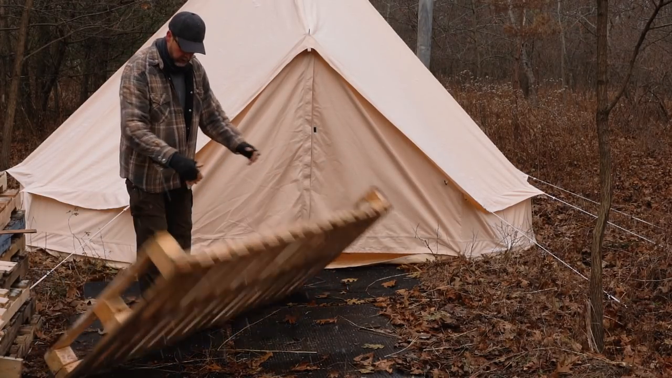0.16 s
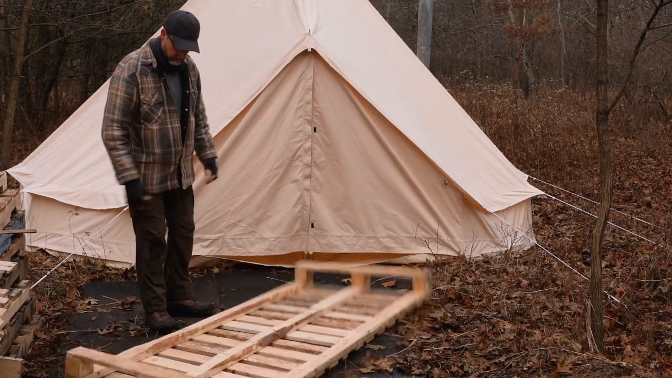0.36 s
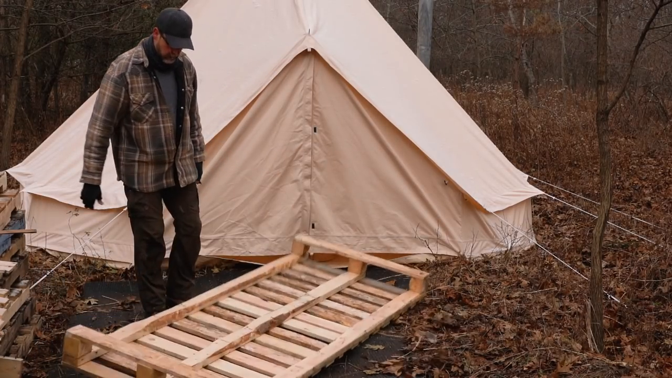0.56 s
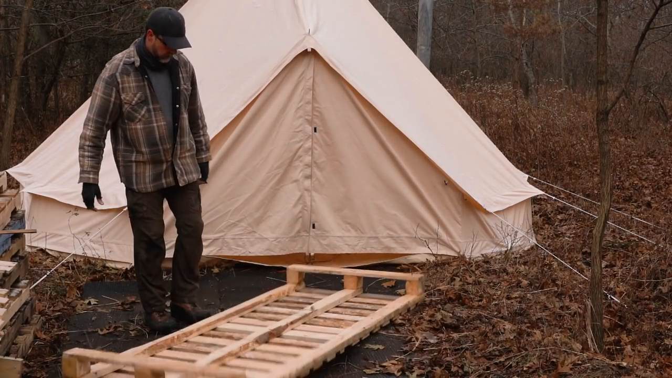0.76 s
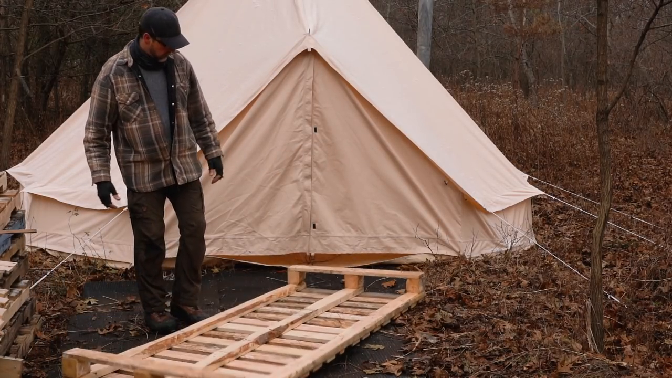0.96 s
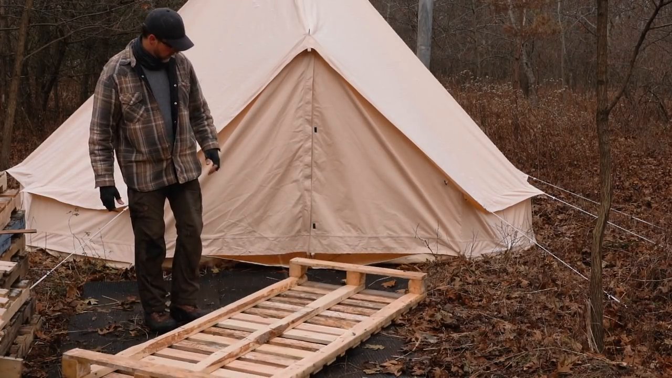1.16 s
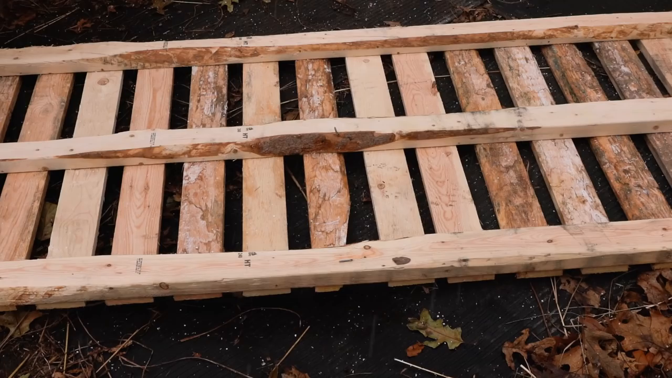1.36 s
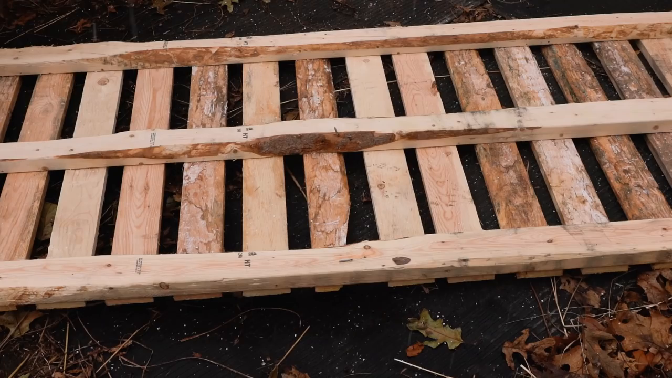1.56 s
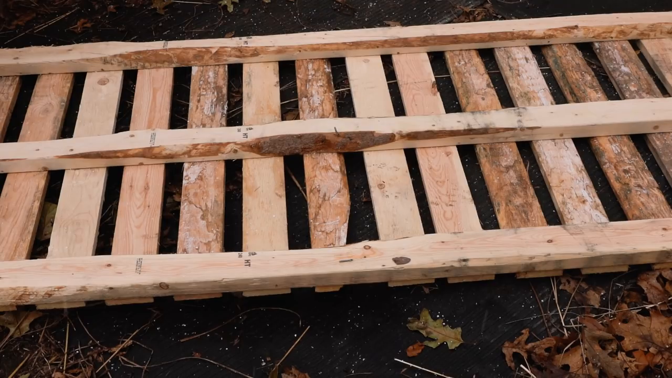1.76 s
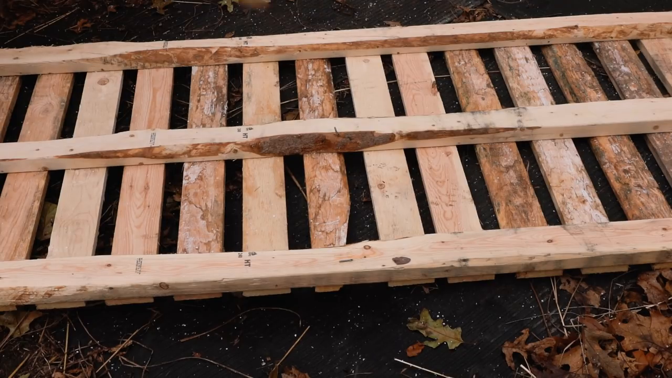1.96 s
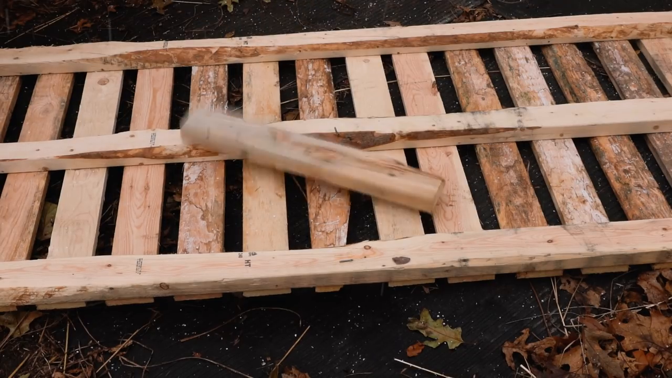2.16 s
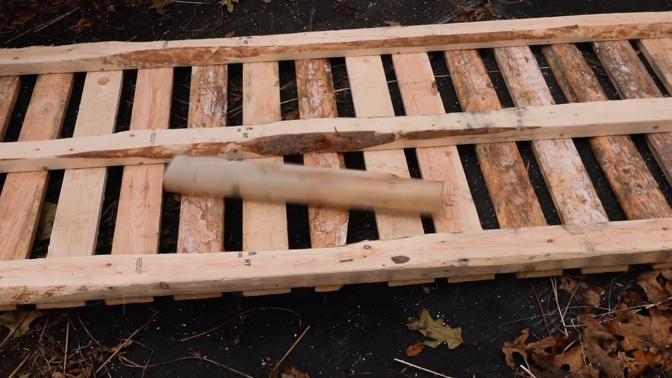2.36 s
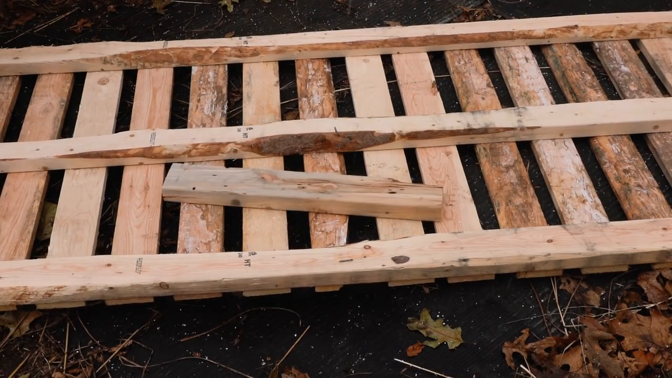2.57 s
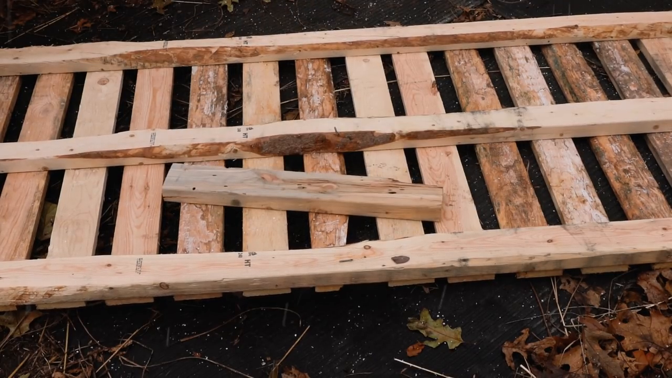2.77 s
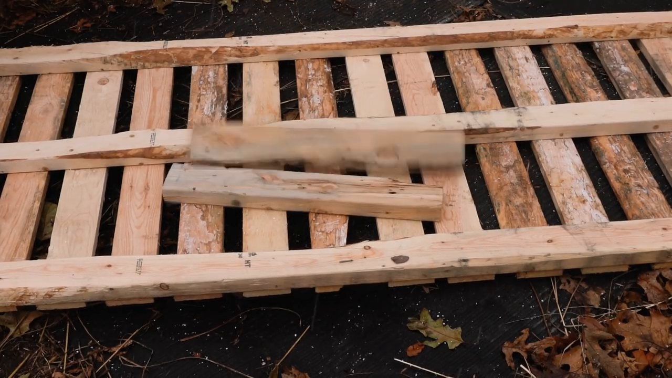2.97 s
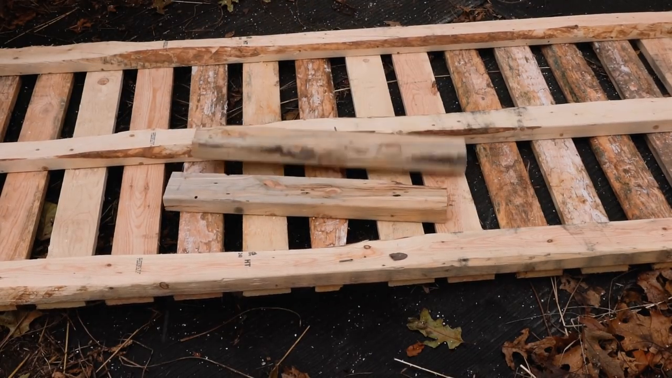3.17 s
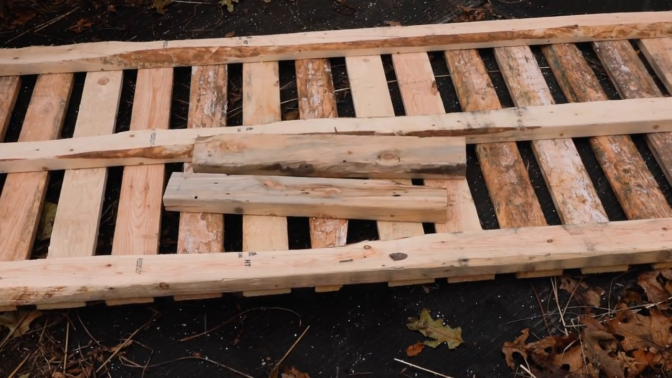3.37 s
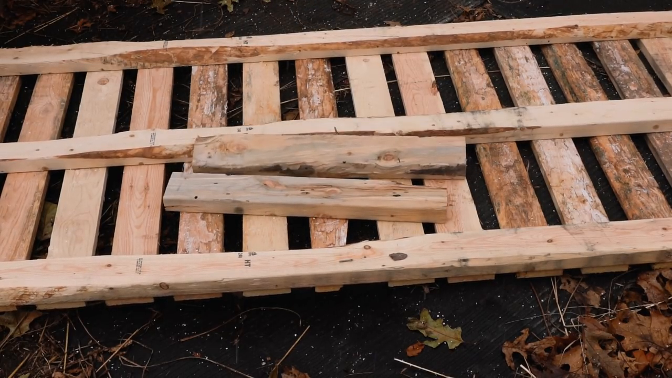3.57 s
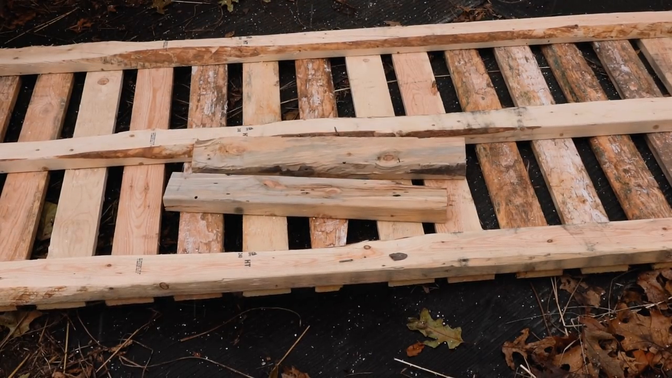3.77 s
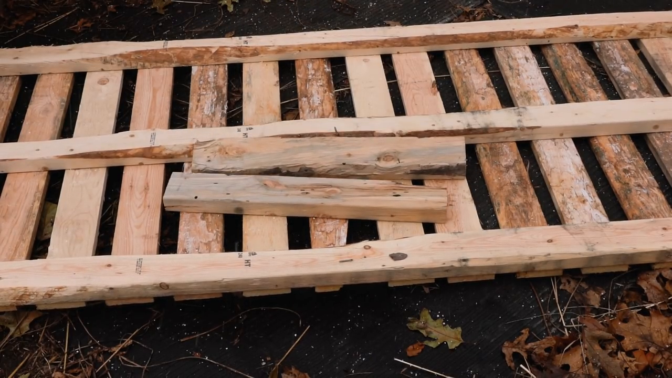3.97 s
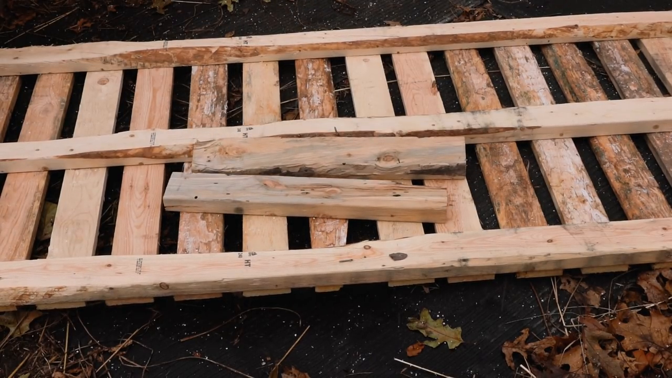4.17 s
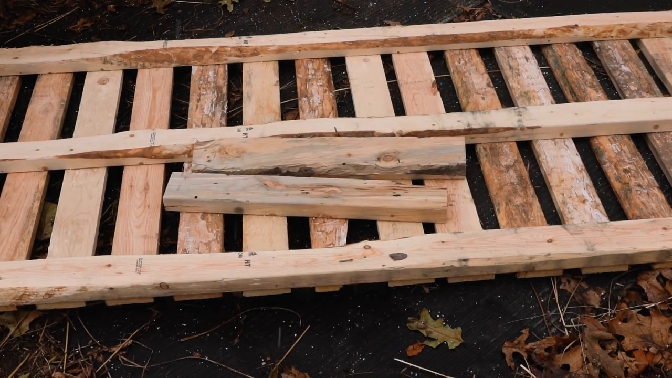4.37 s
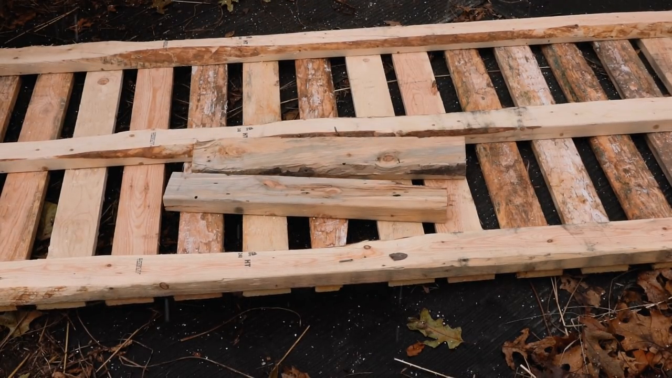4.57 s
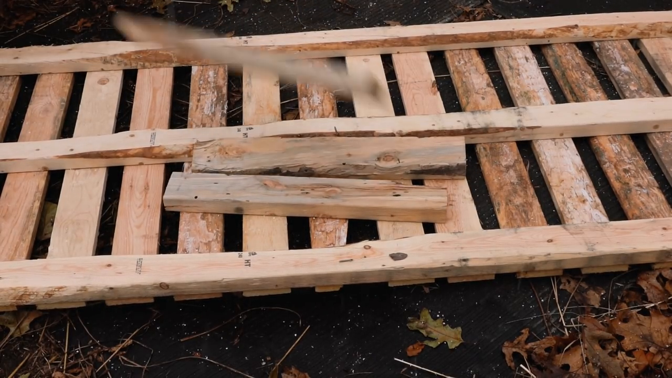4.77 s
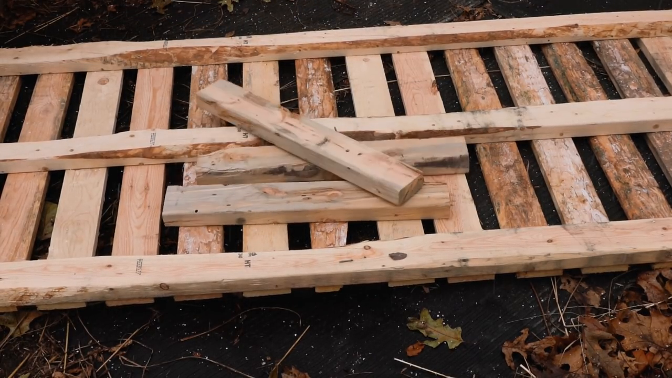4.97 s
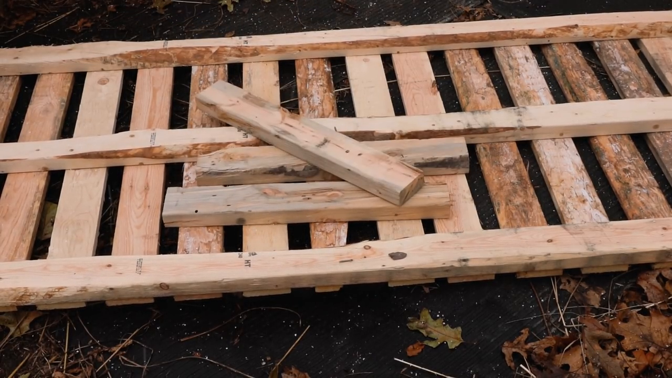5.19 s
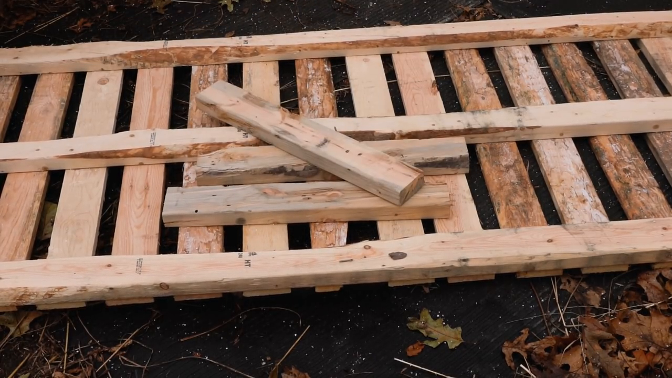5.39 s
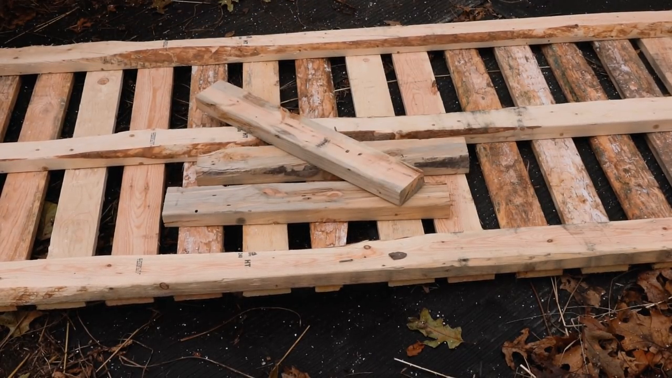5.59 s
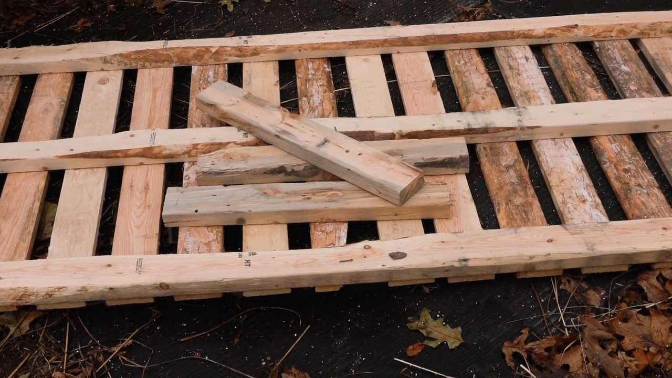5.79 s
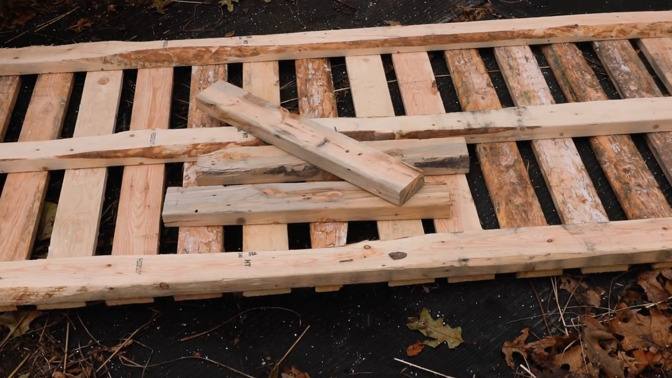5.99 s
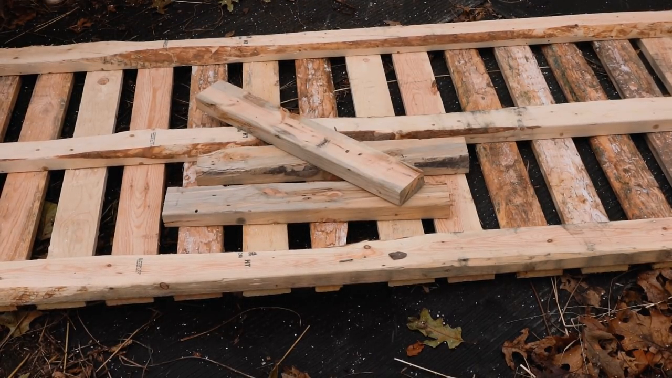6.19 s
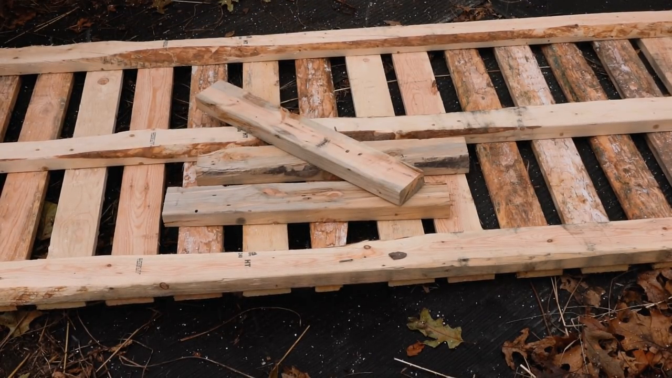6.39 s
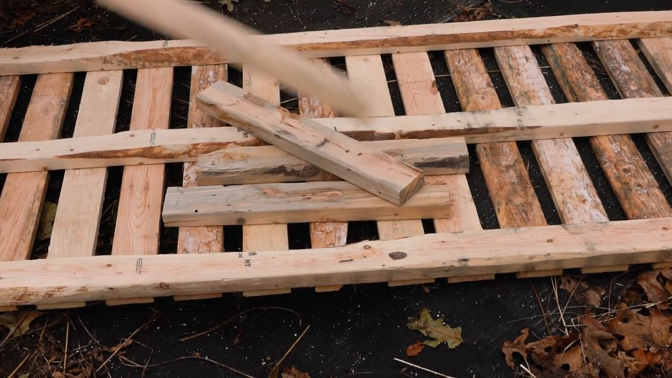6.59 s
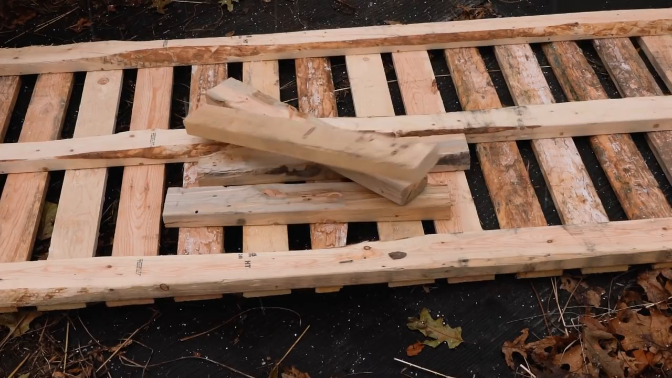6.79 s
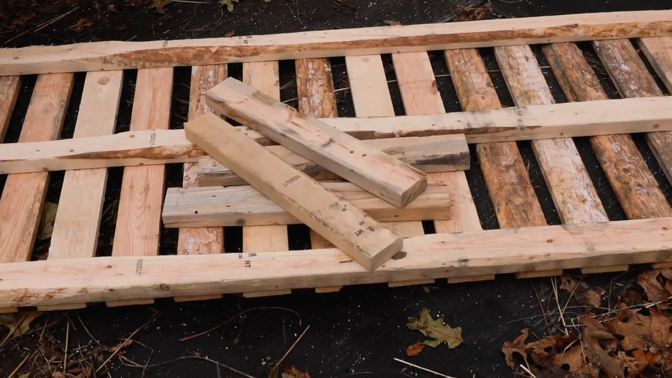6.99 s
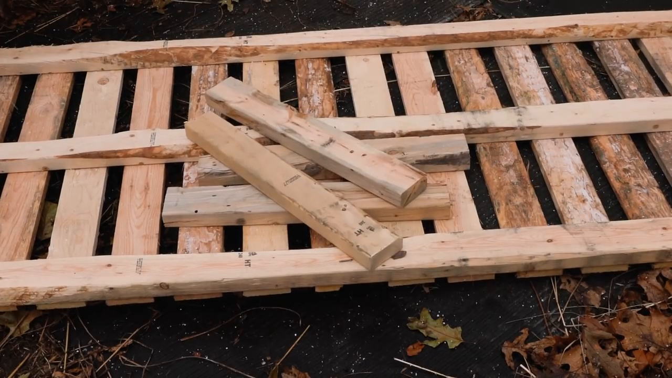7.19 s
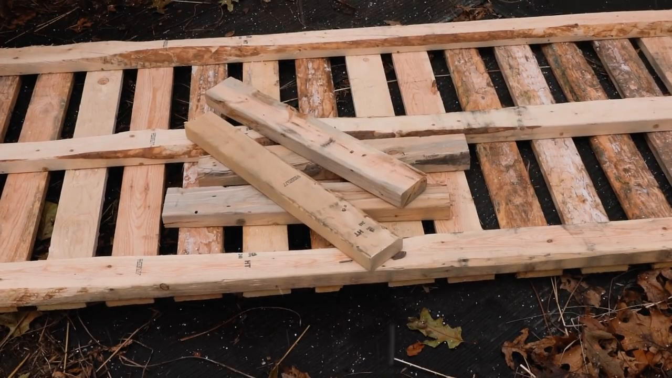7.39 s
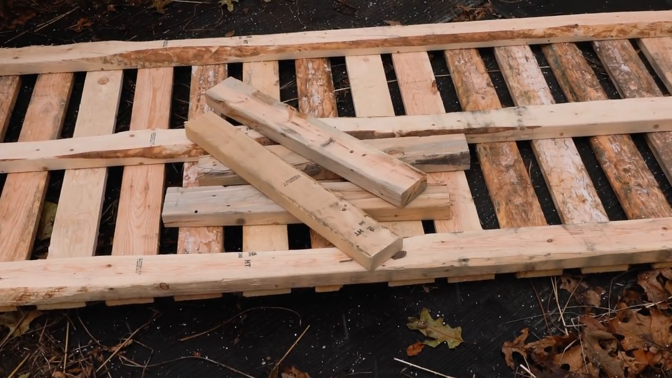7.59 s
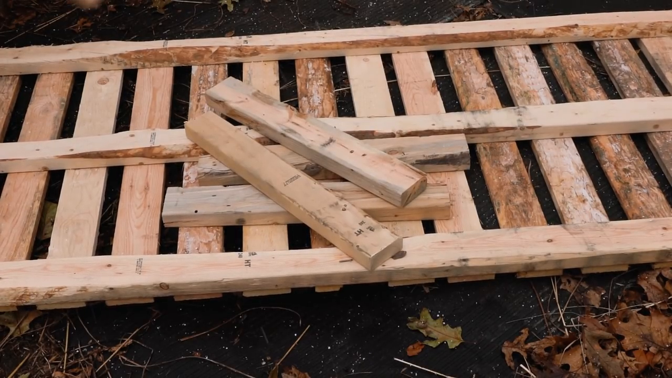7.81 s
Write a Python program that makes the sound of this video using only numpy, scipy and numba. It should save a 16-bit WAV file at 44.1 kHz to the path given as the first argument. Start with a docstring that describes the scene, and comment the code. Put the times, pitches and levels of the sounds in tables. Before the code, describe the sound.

Close outdoor wood sounds in mono: a pallet falls with a double slam, dry leaves crunching beneath, and knocks unevenly to rest. After a pause, boards are dropped on it one at a time, each giving a sharp knock, a few bounces and a short woody ring. Scraping, a shifted board and a tiny tap fill the gaps. Faint leaf ticks and low woodland hush lie underneath; the hardest blows sound squashed.

```python
"""Outdoors on leafy ground, one channel, the wood close and dry: a pallet topples and rocks to rest.
After a faint rustle, two short boards drop on the pallet, chattering as they ring. Wood is scraped as
a third is lifted off the stack, jolting a spare one, and dropped; after more handling, a fourth falls.
Knocks are filtered noise, ringing is decaying sines; trees return a dull echo over a quiet hush.
The recorder's compressor and clipping flatten the hardest blows."""
import sys
import numpy as np
from scipy import signal
from scipy.fft import rfft, irfft
from scipy.io import wavfile
from scipy.ndimage import uniform_filter1d
from numba import njit

SR = 44100
rng = np.random.default_rng(int(sys.argv[2]) if len(sys.argv) > 2 else 0)


def unload_audio(sound):
    """Save the sound as a 16-bit wav file, at the path given as the first command line argument."""
    columns = np.transpose(np.atleast_2d(sound))
    # keep every value between -1 and 1, then stretch to whole-number steps
    steps = np.round(np.clip(columns, -1, 1) * 32767)
    wavfile.write(sys.argv[1], SR, steps.astype(np.int16))


N = 346185
TIME = np.arange(N) / SR  # s
RING_TIME = TIME[:SR // 2]  # s, the half second given to each blow

# Pallet hitting the ground, corner to corner:
# (time [s], force [dB], brightness [dB per octave], thud before trim [dB re force])
PALLET_BLOWS = [(.421, 2.5, 1, 3.5), (.440, 1, 0, 0.5), (.484, -11.5, 0.5, -7), (0.585, -13.5, -4.5, 5),
                (.605, -1, -1, -5), (0.7715, -2.5, 1.5, -15), (.794, -8, 0.5, 9), (.804, 2.5, -1, -2),
                (.890, -4, 1, 1), (1.011, -9.5, 0, 0.5), (1.1452, -9.5, -6, -1.5), (1.3411, -14.5, -3.5, 2)]
# Clear knocks of board on wood: (time [s], force [dB], brightness [dB per octave])
BOARD_BLOWS = [ (2.2126, 0, 1), (2.236, 16.5, 2), (2.402, -5.5, -0.5), (2.444, -1.5, 2), (2.462, 1.5, -0.5),
               (2.499, -5.5, -1.5), (2.554, -4.5, 2.5), (2.601, -7.5, -2), (3.033, 4.5, 5),
               (3.0702, 14.5, 1.5), (3.116, 0, -0.5), (3.136, -1.5, 0.5), (3.165, -10, -1.5),
               (3.2325, 0.5, -2.5), (3.304, -1.5, -4.5), (3.347, -11.5, -5.5), (3.406, -13, -4.5),
               (3.934, -7.5, -3.5), (4.103, -1, -3), (4.915, 5.5, -.5), (4.937, 0, .5), (4.979, 1.5, 0),
               (4.993, 0.5, 1.2), (5.033, -6, -1), (5.052, 1, -3), (5.066, -2, -3.5), (6.717, 1.5, 1.5),
               (6.744, 15, 2.5), (6.762, 11, -2), (6.826, 3, -5), (6.923, 1.5, -4.5), (6.987, 0.5, -6),
               (7.015, 12.5, 1), (7.068, 5, -4)]
# When each board after the first takes its turn: (time [s])
NEXT_BOARD_TIMES = [2.9, 3.6, 4.05, 4.8, 6.5]
# Chatter of each turn, until the board lies flat: (start [s], flat [s], chatter level [dB],
# chatter brightness [dB per octave], ring level [dB])
CLATTERS = [(2.46, 2.615, -15.5, -3.5, -1.5), (3.242, 3.311, -5.5, -4, -2.5),
            (3.94, 3.983, -16.5, -6.5, -8), (4.115, 4.146, -9, -3, -1.5), (4.921, 5.08, -4.5, -2.5, -2),
            (6.78, 7.088, -6.5, -9, -3)]
# Low bumps of the pallet swaying under a landed board: (time [s], level [dB])
SWAYS = [(2.295, -15.5), (3.155, -15.5), (6.92, -17)]
# Leaves crushed by the pallet, loudest as it first lands: (time [s], level [dB])
LEAF_CRUSHES = [(0.432, -18.5), (.8, -27.5), (1.29, -40.5)]
# Rubs and scrapes: a faint rustle first, then wood sliding over wood or glove as it is picked up:
# (time [s], length [s], level [dB], brightness [dB per octave])
SCRAPES = [(1.854, 0.047, -47.5, 8.5), (3.606, 0.31, -32.5, -3.5), (4.284, 0.028, -30.5, 3.5),
           (4.55, 0.042, -52, 8.5), (5.881, 0.019, -38, 2), (6.236, 0.19, -49, 6.5)]

# Bending and twisting modes of the pallet, before detuning: (frequency [Hz], level [dB], t60 [s])
PALLET_MODES = [(220, -27, 0.089), (430, -17.5, 0.05), (1271, -7, 0.036), (1570, -25.5, 0.19),
                (2580, -16, 0.038), (3340, -17, 0.045)]
# Modes of each board, in the same columns: (frequency [Hz], level [dB], t60 [s])
FIRST_BOARD = [(254.5, -18, 0.22), (360.5, -22, 0.31), (932, -11, 0.14), (1190, -27, 0.2),
               (1423, -8, 0.044), (1657, -6.5, 0.022), (1876, -6.5, 0.024), (2874, -26, 0.11)]
SECOND_BOARD = [(225, -20.5, 0.2), (377, -9, 0.12), (631, -15.5, 0.22), (749, -16.5, 0.19), (903, -9, 0.14),
                (982, -9.5, 0.2), (1320, -5, 0.048), (1780, -38, .07), (3070, -8, 0.021),
                (3840, -8.5, 0.014)]
THIRD_BOARD = [(208, -23, 0.25), (402.6, -8.5, 0.12), (618, -14, 0.1), (910, -13, 0.16), (1005, -8.5, 0.14),
               (1256, -11, 0.068), (1459, -8, 0.033), (1878, -11, 0.053), (2600, -39, .04),
               (3390, -28, 0.13)]
SPARE_BOARD = [(387, -13.5, 0.076), (515, -6.5, 0.28), (904, -26, 0.16), (998, -5, 0.074),
               (1108, -10, 0.12), (1820, -17, 0.1), (3360, -25, 0.17)]
FOURTH_BOARD = [(509, -12.5, 0.54), (772, -14.5, 0.12), (952, -5.5, 0.081), (1284, -8.5, 0.13),
                (1565, -10, 0.065), (2284, -5, 0.024), (2820, -5, 0.021), (3240, -20, 0.041)]
# A pallet slat, nailed down and quickly damped: (frequency [Hz], level [dB], t60 [s])
SLAT_MODES = [(688, -12, 0.055), (1209, -16, 0.059), (1693, -10, 0.04), (3023, -13.5, 0.031)]
# A light tap of wood on wood as a board is lifted: (frequency [Hz], level [dB], t60 [s])
TAP_MODES = [(1300, -36.5, 0.21), (1310, -12.5, 0.0083), (1610, -21, 0.011), (2300, -27, 0.014),
             (2740, -20.5, 0.0081)]
# The board heard in each turn; the third is lifted off the stack and jolts the spare before it drops
BOARD_TURNS = [FIRST_BOARD, SECOND_BOARD, THIRD_BOARD, SPARE_BOARD, THIRD_BOARD, FOURTH_BOARD]

# Spectrum of the pallet's knock: (frequency [Hz], level [dB])
PALLET_KNOCK = [(60, 8.5), (200, -11), (450, 1.5), (700, 2.5), (1400, 3), (2200, 1.5), (3500, 2.5),
                (4600, -14), (8000, -28), (16000, -38)]
# Spectrum of a board's knock: (frequency [Hz], level [dB])
BOARD_KNOCK = [(60, -12), (200, -2), (500, -0.5), (900, 5.5), (1800, -1), (2300, -9.5), (3700, -15.5),
               (4700, -30), (8000, -40), (16000, -56)]
# Spectrum of the frame's low thud: (frequency [Hz], level [dB])
THUD = [(25, -49), (60, -6), (125, -0.5), (240, -3), (450, -8.5), (900, -21.5), (3000, -72)]
# Spectrum of dry leaves: (frequency [Hz], level [dB])
RUSTLE = [(60, -5), (300, 10), (800, 3.5), (2000, -1), (3600, -1.5), (4700, -16.5), (9000, -26),
          (16000, -30)]
# Spectrum of the rubs and scrapes: (frequency [Hz], level [dB])
SCRAPE = [(100, -3), (380, 4), (900, -3), (1400, -4), (2000, -3.5), (3600, -3), (5000, -21.5), (16000, -54)]
# Spectrum of the echo: (frequency [Hz], level [dB])
ECHO = [(60, 11), (200, 8.5), (500, -7.5), (1000, -2), (2200, -4), (3600, 0.5), (5000, 1), (16000, -28)]
# Spectrum of the still air of the woods: (frequency [Hz], level [dB])
HUSH = [(20, -58), (40, -8.5), (62, 1.5), (130, 0.2), (240, -10), (450, -11), (950, -16), (1400, -26),
        (2300, -29), (3200, -25), (3800, -23), (5200, -35), (9000, -39), (16000, -47.5)]


def pallet():
    """The heavy frame lands on one edge and rocks; a corner grazes the ground just before each blow."""
    graze_lead_s, graze_db = 0.0085, -20.5
    grazes = [(s - graze_lead_s, db + graze_db, bright_db, thud_db)
              for s, db, bright_db, thud_db in PALLET_BLOWS]
    out = np.zeros(N)
    for s, db, bright_db, thud_db in PALLET_BLOWS + grazes:
        tone = ring(PALLET_MODES, bright_db)
        sound = blow(tone, PALLET_KNOCK, bright_db, thud_db, knock_t60=0.017, rattle_db=-18.0,
                     rattle_t60=0.13, thud_t60=0.071, thud_trim_db=-4.5, contact_s=0.00048)
        add(out, s, undb(db) * sound)
    return out


def boards():
    """Each board bounces from end to end on the slats and chatters to rest."""
    out = np.zeros(N)
    for turn, (modes, clatter) in enumerate(zip(BOARD_TURNS, CLATTERS)):
        from_s, flat_s, chatter_db, chatter_bright_db, ring_db = clatter
        knocks = [row for row in BOARD_BLOWS if np.searchsorted(NEXT_BOARD_TIMES, row[0]) == turn]
        contacts = knocks + edge_slaps(knocks) + chatter(from_s, flat_s, chatter_db, chatter_bright_db)
        for s, db, bright_db in contacts:
            later_knocks = [row[0] for row in knocks if row[0] > s]
            stopped_s = min(later_knocks + [max(flat_s, s)])
            add(out, s, strike(modes, db, bright_db, ring_db, stopped_s - s))
    return out


def edge_slaps(knocks):
    """A board never lands square: its other edge slaps down, softer, just after each knock."""
    mean_delay_s, slap_db = 0.0045, -7  # the delay is near the mean of its random range
    return [(s + mean_delay_s * rng.uniform(0.486, 1.5), db + slap_db, bright_db)
            for s, db, bright_db in knocks]


def chatter(from_s, flat_s, db, bright_db, count=24):
    """Light, uneven contacts of a settling board, as rows (time [s], force [dB], brightness)."""
    gap_s, spread_db = 0.021, 2.5
    shift = rng.uniform(-.5, .5, count)
    strength = rng.standard_normal(count)
    times = from_s + gap_s * (np.arange(count) + .5 + shift)
    return [(s, db + spread_db * k, bright_db) for s, k in zip(times, strength) if s < flat_s]


def strike(modes, db, bright_db, ring_db, free_s):
    """A board meets a slat and rings freely for free_s, until the next clear knock or until it lies flat."""
    held_s = np.maximum(RING_TIME - free_s, 0)
    damping = fade(held_s, t60=0.12)
    tone = undb(ring_db) * ring(modes, bright_db, detune=0.013) * damping
    # every bounce finds another slat, with a pitch of its own
    slat = ring(SLAT_MODES, bright_db, detune=0.178)
    # the thud is set relative to the force, so in all it grows 0.13 dB per dB of force
    thud_db = (0.13 - 1) * db
    sound = blow(tone + slat, BOARD_KNOCK, bright_db, thud_db, knock_t60=0.022, rattle_db=-15.5,
                 rattle_t60=0.16, thud_t60=0.3, thud_trim_db=-29.5, contact_s=0.00092)
    return undb(db) * sound


def blow(tone, knock_colour, bright_db, thud_db, knock_t60, rattle_db, rattle_t60, thud_t60,
         thud_trim_db, contact_s):
    """One contact: a dense knock that dies fast, the slats' rattle, the piece's tone, the frame's thud."""
    t = RING_TIME
    grain, frame = rng.standard_normal((2, len(t)))
    decay = fade(t, knock_t60) + undb(rattle_db) * fade(t, rattle_t60)
    knock = colour(grain * decay, knock_colour, bright_db)
    thud = colour(frame * fade(t, thud_t60), THUD)
    # a duller blow is a longer push, so it swells more slowly
    push = 1 - np.exp(-t / (contact_s * 2 ** (-bright_db / 2)))
    return push * (knock + tone + undb(thud_db + thud_trim_db) * thud)


def ring(modes, bright_db=0, detune=0.0044):
    """Free vibration: the place of contact sets each mode's sign and strength and detunes it."""
    hz, db, t60 = np.transpose(modes)[:, :, None]
    hz = hz * np.exp(detune * rng.uniform(-0.985, 1, hz.shape))
    place = rng.choice([-1, 1], hz.shape) * undb(rng.uniform(-0.63, 1, hz.shape))
    strength = place * undb(db) * tilt(hz, bright_db)
    waves = strength * fade(RING_TIME, t60) * np.sin(2 * np.pi * hz * RING_TIME)
    return np.sum(waves, axis=0)


def sways():
    """The springy frame answers a landing late, with a low bump that swells and dies."""
    rise_s, t60_s = 0.012, 0.29
    swell = (1 - np.exp(-RING_TIME / rise_s)) * fade(RING_TIME, t60_s)
    swell = swell / swell.max()
    out = np.zeros(N)
    for s, db in SWAYS:
        bump = colour(rng.standard_normal(len(swell)) * swell, THUD)
        add(out, s, undb(db) * bump)
    return out


def leaves():
    """Dry leaves stir in the air ahead of the falling pallet, crackle under it and settle."""
    rise_db_per_s, fall_db_per_s = 340, 56
    level = np.zeros(N)
    for s, db in LEAF_CRUSHES:
        drop_db = np.maximum(rise_db_per_s * (s - TIME), fall_db_per_s * (TIME - s))
        level += undb(db - drop_db)
    return colour(grains(per_s=3300, spread_db=-1.5), RUSTLE) * level


def scrapes(body_db=-17, patchy_db=-0.7):
    """Rubs and scrapes: grain catches and slips in short strokes, which stir a board's modes (the third board's
    modes serve for every stroke)."""
    out = np.zeros(N)
    slips = unit(grains(per_s=5500, spread_db=.5) * undb(patchy_db * walk(45)))
    for s, length, db, bright_db in SCRAPES:
        progress = RING_TIME / length
        # swells to about 1 halfway through and is cut short past the end
        stroke = 2 * np.e * progress * np.exp(-2 * progress) / (1 + progress ** 8)
        rub = colour(stroke * slips[int(s * SR):][:len(stroke)], SCRAPE, bright_db)
        board = ring(THIRD_BOARD, bright_db)
        body = signal.oaconvolve(rub, board / np.linalg.norm(board))[:len(rub)]
        add(out, s, undb(db) * (rub + undb(body_db) * body))
    return out


def tap():
    """One small dry tap of wood on wood with a thin ring."""
    out = np.zeros(N)
    add(out, 5.798, ring(TAP_MODES))
    return out


def trees(x, echo_db, t60, build_s):
    """Trunks and the tent scatter back an echo that builds up and dies away."""
    t = TIME[:SR]
    envelope = (1 - np.exp(-(t / build_s) ** 2)) * fade(t, t60)
    response = colour(rng.standard_normal(len(t)) * envelope, ECHO)
    response = response / np.sqrt(np.sum(response ** 2))
    return undb(echo_db) * signal.oaconvolve(x, response)[:N]


def outdoors():
    """A softly wavering hush of coloured noise, with the leaf litter ticking."""
    hush = unit(colour(rng.standard_normal(N), HUSH, size=8192))
    level_db = -35.5 + 0.5 * walk(4.25)
    return hush * undb(level_db) + litter(floor_db=-39)


def litter(floor_db, count=500):
    """Faint dry ticks in the leaf litter, each a short decaying sine at its own pitch."""
    out, t = np.zeros(N), TIME[:SR // 100]
    for when, pitch, size, length in rng.random((count, 4)):
        hz = 4000 * 3.4 ** pitch
        tick = fade(t, 0.0009 + 0.0025 * length) * np.sin(2 * np.pi * hz * t)
        add(out, when * N / SR, undb(floor_db + 14.5 * size ** 3) * tick)
    return out


def grains(per_s, spread_db):
    """Random tiny clicks of very unequal size."""
    present = rng.random(N) < per_s / SR
    size = undb(spread_db * np.minimum(rng.exponential(size=N), 4))
    return unit(present * rng.standard_normal(N) * size)


def walk(rate):
    """Random levels held 1 / rate s, smoothed twice, at rms 1."""
    k = int(SR / rate)
    steps = np.repeat(rng.standard_normal(N // k + 1), k)
    return unit(uniform_filter1d(uniform_filter1d(steps, k), k)[:N])


def colour(x, points, slope_db=0, size=2048):
    """Causal minimum-phase filter through (Hz, dB) points, of unit power before its tilt."""
    hz = np.maximum(np.arange(size // 2 + 1) * SR / size, 1)
    knots, db = np.transpose(points)
    gain = unit(undb(np.interp(np.log(hz), np.log(knots), db))) * tilt(hz, slope_db)
    # folding the cepstrum gives the phase that makes the filter causal
    cepstrum = irfft(np.log(gain))[:size // 2]
    cepstrum[1:] *= 2
    impulse = irfft(np.exp(rfft(cepstrum, size)))
    return signal.oaconvolve(x, impulse)[:len(x)]


def tilt(hz, slope_db):
    """Gain of a slope in dB per octave about 1 kHz, held level below 400 Hz."""
    return undb(slope_db * np.log2(np.maximum(hz, 400) / 1000))


def fade(t, t60):
    """Exponential decay that loses 60 dB in t60."""
    return np.exp(-np.log(1000) * t / t60)


def undb(db):
    """Decibels to gain."""
    return 10 ** (np.asarray(db) / 20)


def unit(x):
    """Scale to rms 1."""
    return x / np.sqrt(np.mean(x ** 2))


def add(track, s, sound):
    """Mix a sound in at time s."""
    i = int(s * SR)
    track[i:i + len(sound)] += sound[:N - i]


def scene():
    """All the wood and leaves, their echo and the open air."""
    air = outdoors()
    wood = pallet() + sways() + leaves() + scrapes() + tap() + boards()
    echo = trees(wood, echo_db=-26.5, t60=0.85, build_s=0.015)
    return (wood + echo + air)[None]


@njit
def follow(x, attack, release):
    """Envelope that rises fast and sinks slowly."""
    out, e = np.empty(len(x)), 0.
    for i in range(len(x)):
        e += (abs(x[i]) - e) * (attack if abs(x[i]) > e else release)
        out[i] = e
    return out


def compress(x, threshold_db, slope, attack_s, release_s):
    """Turn the gain down above a threshold; the first milliseconds of a blow slip through."""
    envelope = follow(x, 1 / (attack_s * SR), 1 / (release_s * SR))
    return x * np.maximum(envelope / undb(threshold_db), 1) ** -min(slope, 1)


def record(dry):
    """The recorder compresses, clips what is left over full scale and cuts the top above 16 kHz."""
    squeezed = compress(dry[0], threshold_db=-10.5, slope=0.89, attack_s=0.0053, release_s=0.018)
    clipped = np.clip(squeezed, -1, 1)
    top_cut = signal.ellip(8, .2, 70, 16000, fs=SR, output="sos")
    return signal.sosfilt(top_cut, clipped)[None]


dry = scene()
out = record(dry)
unload_audio(out)
```